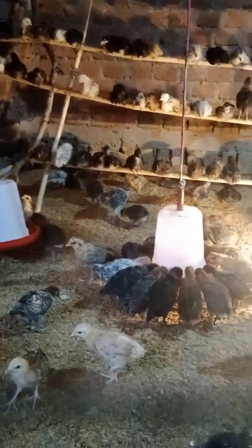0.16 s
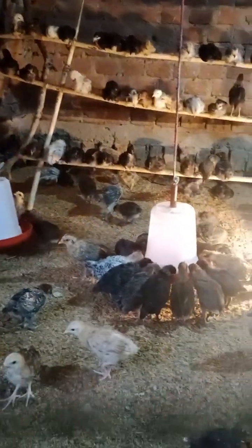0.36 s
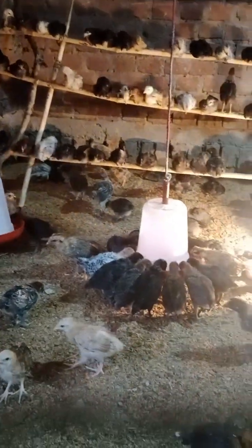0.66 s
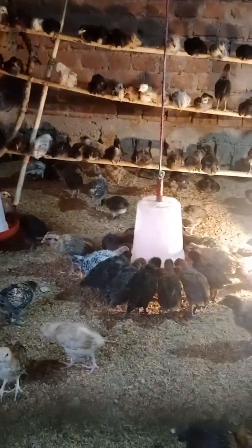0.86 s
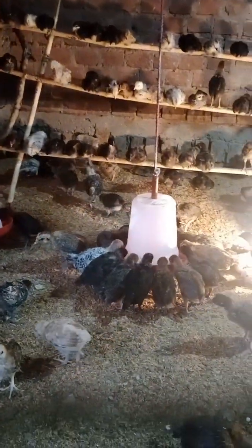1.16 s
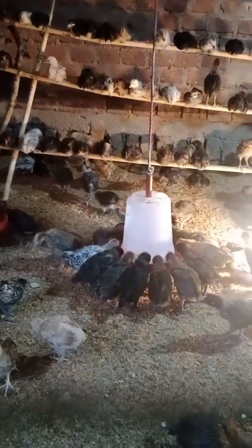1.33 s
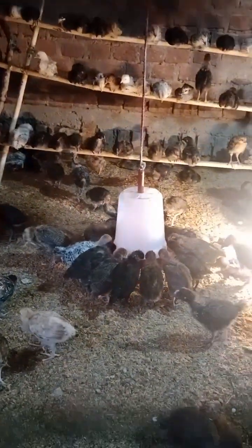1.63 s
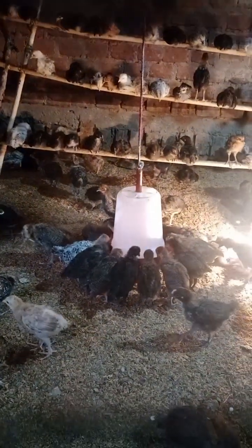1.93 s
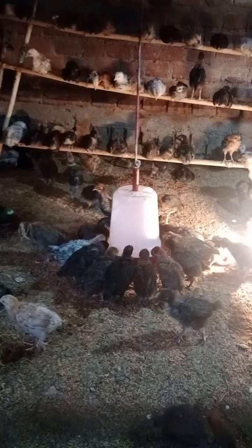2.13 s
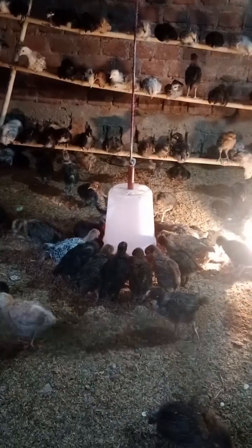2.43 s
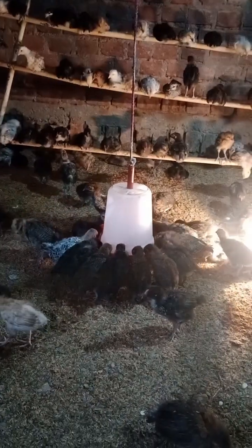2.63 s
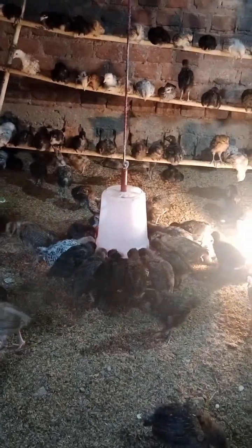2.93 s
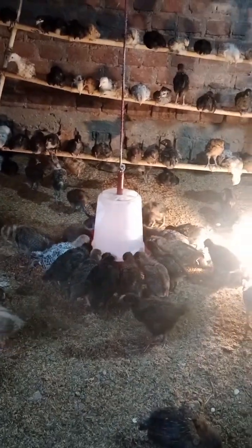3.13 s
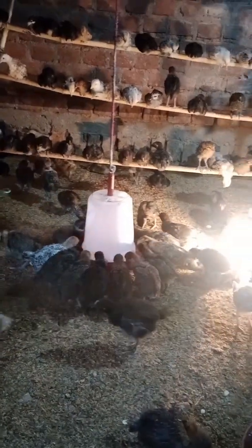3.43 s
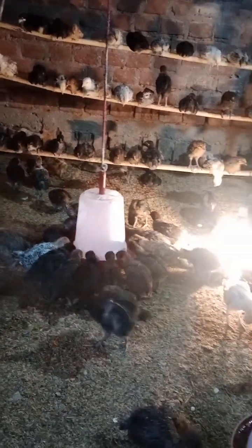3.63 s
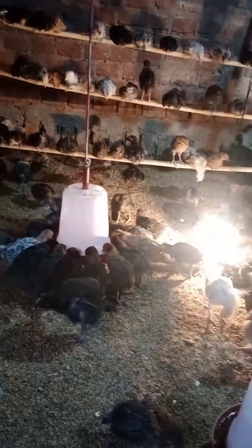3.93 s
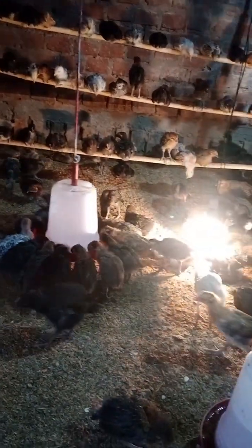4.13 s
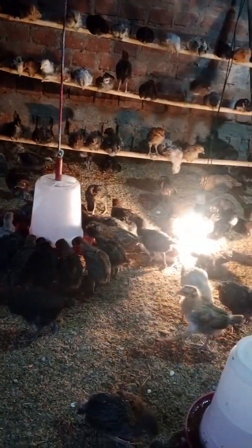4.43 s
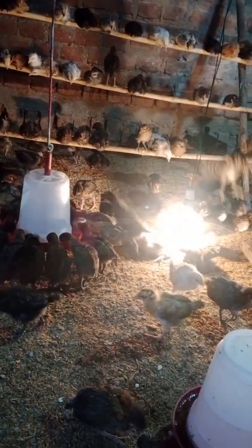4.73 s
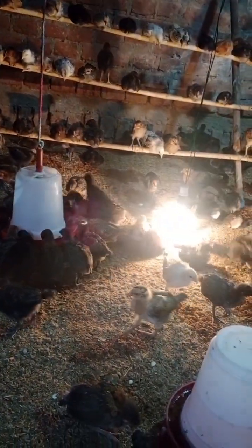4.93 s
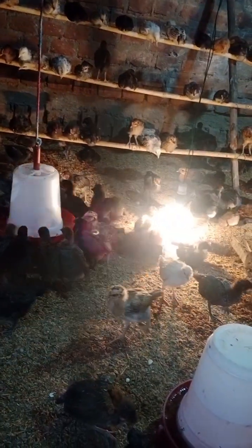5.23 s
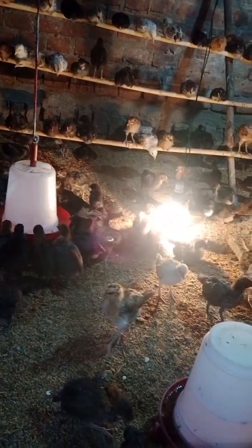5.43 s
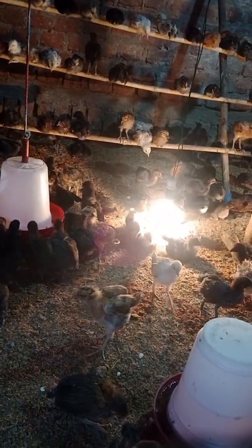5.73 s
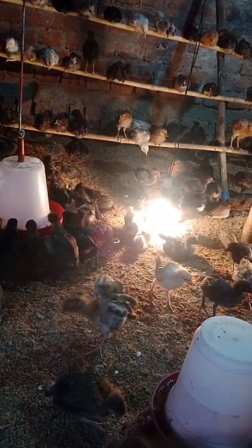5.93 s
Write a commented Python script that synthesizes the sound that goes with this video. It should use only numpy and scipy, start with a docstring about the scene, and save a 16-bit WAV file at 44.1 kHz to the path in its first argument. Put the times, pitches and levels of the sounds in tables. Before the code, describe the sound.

Young chicks peep softly in an echoing brick shed while a rooster crows far off, then one close chick lets out a sharp, rough squeak.

```python
"""Young chicks peep softly in a brick shed: falling glides of near-sine tone, blurred by echoes.
One close to the microphone lets out a sharp, rough squeak: a steady and a warbling tone beating together.
A rooster crows far off (two harmonics, then short falling end notes); other fowl call over hum and hiss.
Fingers tick on the hand-held recorder (impulse plus damped thump); its port swallows a band near 5 kHz."""
import sys
import numpy as np
from scipy import signal
from scipy.fft import rfft, irfft
from scipy.io import wavfile
from scipy.ndimage import uniform_filter1d

SR = 44100
rng = np.random.default_rng(int(sys.argv[2]) if len(sys.argv) > 2 else 0)


def pcm_store(signal):
    """Save signal as 16-bit PCM."""
    levels = np.round(np.clip(np.atleast_2d(signal), -1, 1) * 32767)
    wavfile.write(sys.argv[1], SR, levels.astype(np.int16).T)


N = 268128  # samples


def gain_of(db):
    """Decibels to amplitude."""
    return 10 ** (np.asarray(db) / 20)


def evened(x):
    """Scales to rms 1."""
    return x / np.sqrt(np.mean(x ** 2) + 1e-20)


def read(points, hz):
    """Interpolates (f, value) points on a log-frequency axis."""
    f, value = np.transpose(points)
    return np.interp(np.log(hz + 1), np.log(f + 1), value)


def follow(rows):
    """Sample times and every column of a curve at those times."""
    s, *columns = np.transpose(rows)
    t = np.arange(s[0], s[-1], 1 / SR)
    return t, *(np.interp(t, s, c) for c in columns)


def add(mix, start_s, sound):
    """Mixes a sound in at a time, in place."""
    part = mix[max(round(start_s * SR), 0):][:len(sound)]
    part += sound[:len(part)]


def coloured(x, points):
    """Filters by a (Hz, dB) spectrum."""
    f = np.fft.rfftfreq(len(x), 1 / SR)
    return irfft(rfft(x) * gain_of(read(points, f)), len(x))


def wander(size, hz):
    """Smooth noise of about rms 1, Gaussian roll-off at hz."""
    padded = size + SR // 4
    f = np.fft.rfftfreq(padded, 1 / SR)
    spectrum = rfft(rng.standard_normal(padded)) * np.exp(-(f / hz) ** 2)
    return evened(irfft(spectrum))[:size]


def phase_of(hz):
    """Running phase of a pitch curve, rad."""
    return 2 * np.pi * np.cumsum(hz) / SR


def whistle(hz, harmonic_db):
    """Near-sine bird tone: three harmonics, each harmonic_db above the one before."""
    phase = phase_of(hz)
    return np.sqrt(2) * sum(gain_of(harmonic_db * k) * np.sin((k + 1) * phase) for k in range(3))


def call(length_s, start_hz, fall, db, harmonic_db, jitter, crest):
    """Short ragged glide losing share `fall` of its pitch; crest > 1 peaks late and cuts off faster."""
    u = np.linspace(0, 1, round(length_s * SR))
    hz = start_hz * (1 - fall) ** u * (1 + jitter * wander(len(u), 270))
    swell = np.sqrt(np.sin(np.pi * u ** crest).clip(0))
    level_db = db + 2 * wander(len(u), 110)
    return gain_of(level_db) * swell * whistle(hz, harmonic_db)


# reverberation of the shed: f/Hz, t60/s
SHED_T60 = [(200, 1), (1000, 0.32), (3000, 0.31), (9000, 0.34)]


def shed(x, wet_db, early_db, spread_s):
    """Direct sound, eight reflections off floor and walls, and a tail that dies band by band."""
    size = SR // 2
    sparse = rng.random(size) < 2500 / SR  # echoes per second
    late = np.arange(size) > .008 * SR
    taps = rng.choice([-1., 1.], size) * sparse * late
    hz, t, z = signal.stft(taps, SR, nperseg=256)
    decay = gain_of(-60 * t / read(SHED_T60, hz)[:, None])
    tail = signal.istft(z * decay, SR, nperseg=256)[1]
    echo = gain_of(wet_db) * tail / np.linalg.norm(tail)
    delays = (rng.uniform(0.1019, 1, size=8) * spread_s * SR).astype(int)
    echo[delays] += gain_of(early_db) * rng.choice([-1., 1.], len(delays)) / np.sqrt(len(delays))
    echo[0] += 1
    return signal.fftconvolve(x, echo / np.linalg.norm(echo))[:N]


# Call levels in all tables are dry, before swell, echo and port.
# cheeps, long falling glides: t/s, start f/Hz, level/dB, step per harmonic/dB
CHEEPS = [(0.217, 5480, -72, -12), (.368, 5330, -70, -8), (.545, 5420, -65, -26), (1.611, 4610, -67, -5.5),
          (1.797, 4920, -60.5, -4.5), (2.345, 4950, -67.5, -18), (2.399, 4790, -60, -24),
          (2.52, 5400, -73, -18), (2.675, 5060, -65.5, -20), (2.745, 4530, -65.5, -12),
          (2.91, 4720, -60, -8), (3.093, 4820, -69.5, -17), (3.451, 4900, -67, -6), (3.64, 4820, -69, -2),
          (3.743, 4790, -57.5, -9), (4.875, 4580, -55.5, -15.5), (5.598, 4595, -55, -15),
          (5.807, 4765, -51, -18)]
CHEEP_S, CHEEP_FALL = .06, .32  # fall: share of pitch lost
# pips, short soft contact notes: t/s, start f/Hz, level/dB
PIPS = [(.003, 3830, -59.5), (.04, 3300, -65.5), (.189, 3336, -64), (.381, 3365, -58), (.617, 3675, -67.5),
        (1.009, 3600, -65), (1.157, 3420, -60.5), (1.475, 3480, -70), (2.275, 3640, -67.5),
        (2.57, 3200, -72), (2.751, 3320, -75), (3.01, 3440, -63.5), (3.78, 3260, -62), (5.961, 3295, -63)]
PIP_S, PIP_FALL = .031, .21
# toots, level low whistles of resting chicks: t/s, start f/Hz, level/dB
TOOTS = [(1.036, 2526, -62), (1.728, 2595, -62), (2.21, 2880, -70), (3.195, 2550, -65), (3.82, 2445, -61.5),
         (4.681, 2760, -60), (5.866, 2398, -59.5)]
TOOT_S, TOOT_FALL = 0.033, 0.025


def chicks():
    """Nearer chicks: cheeps, pips and toots, blurred by echoes off floor and walls."""
    out = np.zeros(N)
    for s, hz, db, harmonic_db in CHEEPS:
        add(out, s, call(CHEEP_S, hz, CHEEP_FALL, db, harmonic_db, jitter=0.025, crest=2.28))
    for s, hz, db in PIPS:
        add(out, s, call(PIP_S, hz, PIP_FALL, db, harmonic_db=-27, jitter=0.033, crest=1.9))
    for s, hz, db in TOOTS:
        add(out, s, call(TOOT_S, hz, TOOT_FALL, db, harmonic_db=-22, jitter=0.013, crest=1.9))
    return shed(out, wet_db=-4.5, early_db=-1, spread_s=.014)


# steady side's pitch, dropping by two sudden steps: t/s, f/Hz
REGISTERS = [(5.083, 3440), (5.169, 3136), (5.255, 2730)]
# steady side rings out: t/s, 1/e half length/s, boost/dB
SURGES = [(5.155, 0.0052, 7), (5.176, 0.014, 11), (5.201, 0.0046, 21.5), (5.246, 0.0063, 21),
          (5.262, 0.0054, 4.5), (5.291, 0.0062, 24)]
# base level of the syrinx sides, before surges, trim and beak: t/s, steady level/dB, warbling level/dB
SQUEAK = [(5.083, -50.5, -71), (5.11, -35, -53.5), (5.16, -38, -35), (5.24, -37.5, -31.5),
          (5.264, -28, -23.5), (5.287, -37.5, -27.5), (5.316, -23, -23), (5.368, -33, -30.5),
          (5.375, -48, -48.5), (5.392, -46, -56.5)]
# throat and open beak: f/Hz, level/dB
BEAK = [(100, -22.5), (700, -12.5), (1500, 0.5), (2300, -7.5), (2620, 0), (4300, 0), (4750, -37),
        (5100, -28.5), (5600, -4.5), (8200, -1), (10000, -4), (13000, 5.5), (14200, -4), (15500, 8)]
BREAK_S, SLACK = 5.305, 0.344  # strain builds until the voice breaks, then only this share is left
# warbling side sinks toward the steady one
WARBLE_TOP_HZ, WARBLE_END_HZ, SINK_AT_S, SINK_S = 3900, 2846, 5.277, .042


def steady_side(t, steady_db, flutter_db=2):
    """One side of the syrinx: stepped pitch; flutter shrinks while the tone locks into a surge."""
    step_s, step_hz = np.transpose(REGISTERS)
    hz = uniform_filter1d(step_hz[np.searchsorted(step_s[1:], t)], size=400)
    surge_db = sum(boost * np.exp(-((t - s) / half) ** 2) for s, half, boost in SURGES)
    loose = gain_of(-surge_db)
    tone = whistle(hz * (1 + 0.02 * loose * wander(len(t), 350)), -11.5)
    level_db = steady_db + surge_db + flutter_db * loose * wander(len(t), 200)
    return gain_of(level_db) * tone * signal.windows.tukey(len(t), .03)


def warbling_side(t, warbling_db, warble_hz=108, depth_hz=480, rasp_db=-16, shake_hz=140, throb_db=5):
    """Other side: strain deepens warble and shake and drives more air rasp through the open beak."""
    building = np.sqrt(((t - t[0]) / (BREAK_S - t[0])).clip(0))
    strain = uniform_filter1d(np.where(t < BREAK_S, building, SLACK), size=800)
    above_end = .5 * (1 - np.tanh((t - SINK_AT_S) / SINK_S))
    hz = WARBLE_END_HZ + (WARBLE_TOP_HZ - WARBLE_END_HZ) * above_end
    warble = np.sin(phase_of(warble_hz * (1 + .35 * wander(len(t), 90))))
    shake = shake_hz * wander(len(t), 1000)
    tone = whistle(hz + strain * (depth_hz * warble + shake), -8.5)
    rasp = gain_of(rasp_db) * strain * rng.standard_normal(len(t))
    level_db = warbling_db - 0.5 - throb_db * warble
    return gain_of(level_db) * (tone + rasp) * signal.windows.tukey(len(t), .1)


def squeak():
    """Both sides of the syrinx sound at once, beating where they meet, through throat and beak."""
    steady, warbling = np.zeros((2, N))
    t, steady_db, warbling_db = follow(SQUEAK)
    add(steady, t[0], steady_side(t, steady_db))
    add(warbling, t[0], warbling_side(t, warbling_db))
    # wide sweeps overlap their own echoes off nearby surfaces
    both = shed(steady, wet_db=-28, early_db=-22, spread_s=.015)
    both += shed(warbling, wet_db=-18, early_db=-5, spread_s=.006)
    return coloured(both, BEAK)


def flock(per_s=40, loudest_db=-70.0):
    """Chicks on the far perches: short random falling glides with strong room echo."""
    out = np.zeros(N)
    for when, length, pitch, fall, soft in rng.random((round(per_s * N / SR), 5)):
        hz = 2650 + 1350 * pitch ** 1.4
        cheep = call(0.017 * (1 + length), hz, 0.23 * fall, loudest_db - 7 * soft,
                     harmonic_db=-25, jitter=0.011, crest=1.0)
        add(out, when * N / SR, cheep)
    return shed(out, wet_db=-2, early_db=-6.5, spread_s=0.028)


# crow syllables: t/s, length/s, f/Hz, level/dB, octave re fundamental/dB, pitch jitter/share
CROW = [(3.004, 0.22, 900, -56.5, -1.5, 0.02), (3.314, 0.25, 943.3, -51, -7.5, 0.025),
        (3.519, 0.2397, 940.4, -52.5, -4, 0.039), (3.657, 0.17, 893.3, -51, -6.5, 0.018),
        (3.891, 0.529, 896.6, -52.5, 0, 0.0077)]
CROW_RISE_S, CROW_FALL_S, CROW_FADE_DB = 0.069, 0.03, -9.5
CROW_FLUTTER_DB, CROW_FLUTTER_HZ = 2.1, 22
DIP_AT_S, DIP_S, DIP_DB = 4.145, 0.028, -23  # held note dips briefly
SCOOP, SCOOP_S, SAG = 0.1472, .022, 0.0564  # shares of pitch: slide up at onset, sag toward the end


def rooster():
    """Far crow, fundamental plus octave: hoarse short syllables, then a clean held note that sinks."""
    out = np.zeros(N)
    for s, length_s, top_hz, db, octave_db, jitter in CROW:
        t = np.arange(0, length_s, 1 / SR)
        hz = top_hz * (1 - SCOOP * np.exp(-t / SCOOP_S) - SAG * (t / length_s) ** 3)
        phase = phase_of(hz * (1 + jitter * wander(len(t), 220)))
        swell = np.minimum(t / CROW_RISE_S, 1) * np.minimum((length_s - t) / CROW_FALL_S, 1)
        fade_db = CROW_FADE_DB * (t / length_s) ** 3
        flutter_db = CROW_FLUTTER_DB * wander(len(t), CROW_FLUTTER_HZ)
        dip_db = DIP_DB * np.exp(-((s + t - DIP_AT_S) / DIP_S) ** 2)
        tone = np.sqrt(2) * (np.sin(phase) + gain_of(octave_db) * np.sin(2 * phase))
        add(out, s, swell * gain_of(db + fade_db + flutter_db + dip_db) * tone)
    return shed(out, wet_db=-9, early_db=-4, spread_s=.04)


# distant fowl, and the last sinking notes of the crow (4.401, 4.573, 4.768 s):
# t/s, length/s, start f/Hz, level/dB, pitch jitter/share
FAR_NOTES = [(0.255, 0.073, 449, -75, 0.043), (.936, 0.075, 707, -75, 0.015),
             (0.945, .09, 1760, -68.5, 0.037), (1.414, 0.079, 342, -73.5, 0.045),
             (2.06, 0.047, 730, -73, 0.037), (3.001, .06, 745, -66, 0.024),
             (3.351, 0.054, 1180, -63.5, 0.026), (3.471, 0.095, 832, -58.5, 0.028),
             (3.657, 0.14, 661, -59.5, 0.044), (3.812, .1, 551, -65.5, 0.033),
             (3.87, 0.091, 797, -58, 0.027), (4.401, 0.17, 772, -58.5, 0.014),
             (4.573, 0.12, 744, -53, 0.0055), (4.768, 0.14, 634, -66.5, 0.0059),
             (5.324, .1, 744, -62.5, .02), (5.499, .068, 903, -70.5, 0.021)]
FAR_NOTE_FALL = .04


def fowl_and_crow_end():
    """Short, faint, nearly level notes: distant birds and the crow's stepwise falling end."""
    out = np.zeros(N)
    for s, length_s, hz, db, jitter in FAR_NOTES:
        add(out, s, call(length_s, hz, FAR_NOTE_FALL, db, harmonic_db=-19, jitter=jitter, crest=0.86))
    return shed(out, wet_db=-9, early_db=-4, spread_s=.04)


# finger contacts on the case, before colouring: t/s, tick impulse level/dB, thump level/dB
TOUCHES = [(2.4984, -27, -56.5), (3.212, -35, -58.5), (3.369, -39, -62.5), (5.943, -72, -65)]


def fingers(thump_hz=105, thump_decay_s=0.0079):
    """Each contact: a one-sample tick, brightened, and a dull damped thump through the case."""
    ticks, thumps, t = np.zeros(N), np.zeros(N), np.arange(SR // 6) / SR
    push = t / thump_decay_s * np.exp(1 - t / thump_decay_s)
    for s, tick_db, thump_db in TOUCHES:
        add(ticks, s, gain_of([tick_db]))
        noise = rng.standard_normal(len(t))
        knock = evened(coloured(noise, [(35, -28), (80, 9), (450, -9), (2000, -30)]))
        add(thumps, s, gain_of(thump_db) * push * .5 * (np.sin(2 * np.pi * thump_hz * t) + knock))
    return coloured(ticks, [(4000, -20), (7000, 10.5), (15000, 0)]) + thumps


# hiss shape: f/Hz, relative level/dB per Hz
HISS = [(20, -43), (50, -17), (98, -9), (160, -11.5), (300, -4), (380, -12.5), (620, -16), (910, -6),
        (1120, -9), (1550, 0), (3300, -15), (5000, -20.5), (7300, -7.5), (16000, -15.5)]
HISS_DB = -66.4
# hum tones: f/Hz, level/dB before HUM_TRIM_DB
HUM = [(107.7, -87.5), (220.7, -91.5), (285.3, -84), (436.0, -87)]
HUM_TRIM_DB = -2


def background():
    """Even shaped-noise hiss and a faint hum of sines wavering in pitch."""
    hiss = gain_of(HISS_DB) * evened(coloured(rng.standard_normal(N), HISS))
    hum = np.zeros(N)
    for hz, db in HUM:
        hum += gain_of(db + HUM_TRIM_DB) * np.sin(phase_of(hz * (1 + .008 * wander(N, 7.6))))
    return hiss * gain_of(0.13 * wander(N, 7.4)) + np.sqrt(2) * hum


def scene():
    """Everything heard in the shed, on one channel."""
    birds = chicks() + squeak() + flock() + rooster() + fowl_and_crow_end()
    return (birds + fingers() + background())[None]


# microphone port: f/Hz, level/dB
PORT = [(3300, 0.5), (3800, -5), (4450, -5.5), (4900, -13), (5500, -14), (6200, -8), (6900, 0.5),
        (8500, 1.5), (9400, -6), (10600, -6), (11500, -17.5), (13000, -15), (15500, -16.5)]
EDGE_HZ = 15600


def record(dry):
    """Microphone port's colour, then a low-pass band limit."""
    heard = coloured(dry[0], PORT)
    low_pass = signal.firwin(511, EDGE_HZ, window=("kaiser", 9), fs=SR)
    return signal.oaconvolve(heard, low_pass, "same")[None]


dry = scene()
out = record(dry)
pcm_store(out)
```